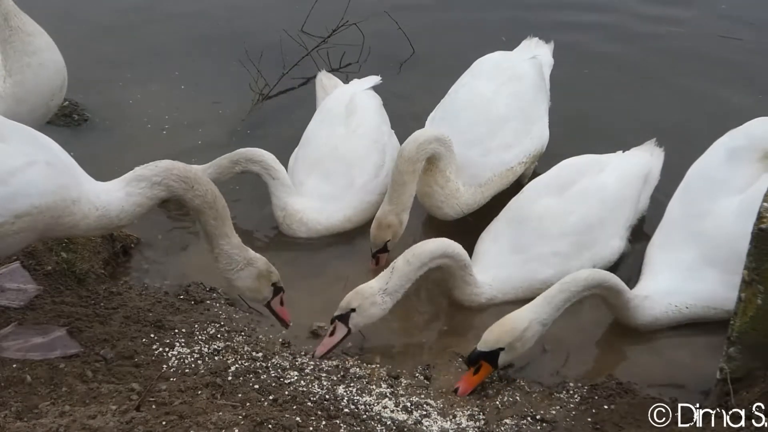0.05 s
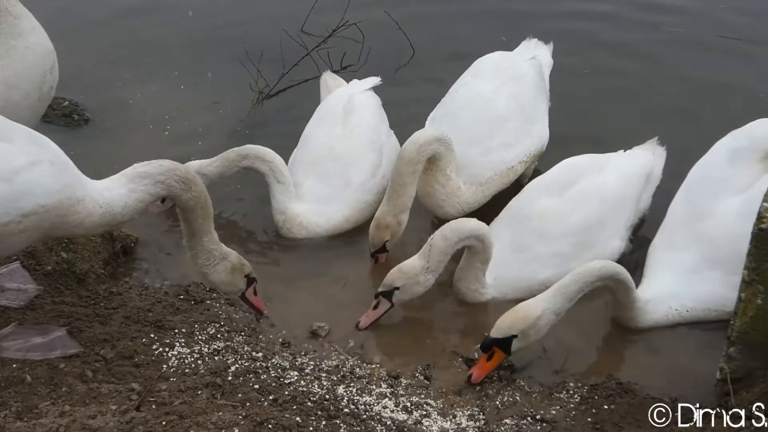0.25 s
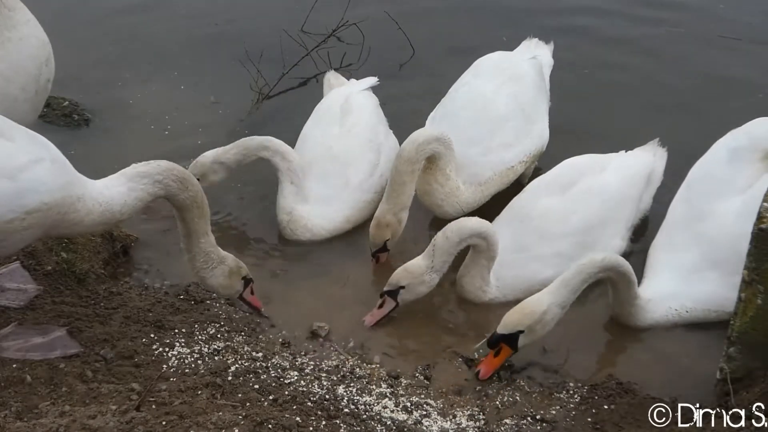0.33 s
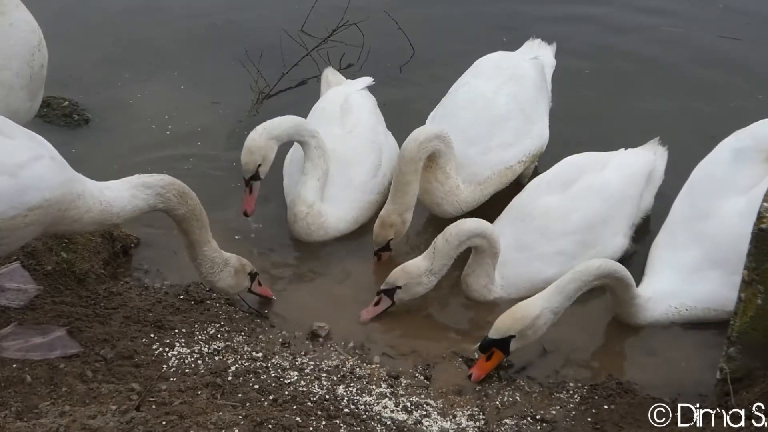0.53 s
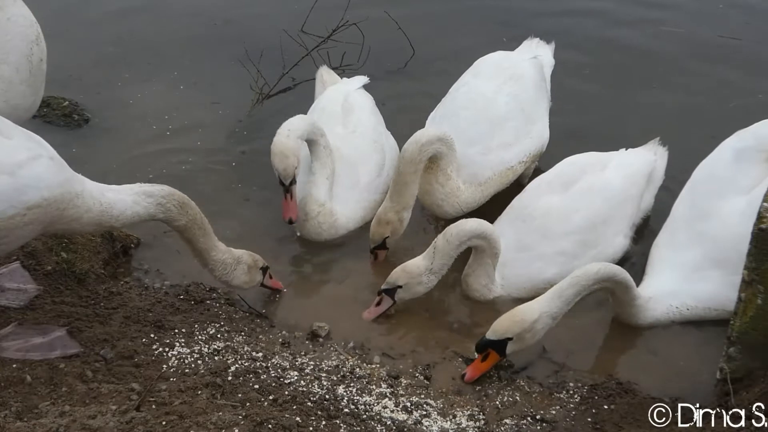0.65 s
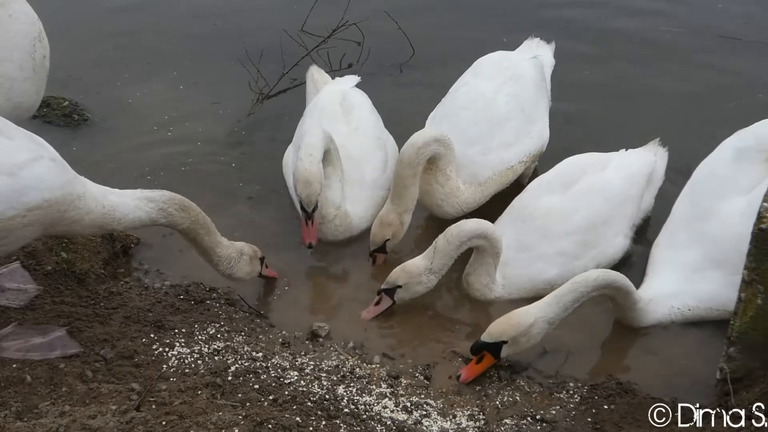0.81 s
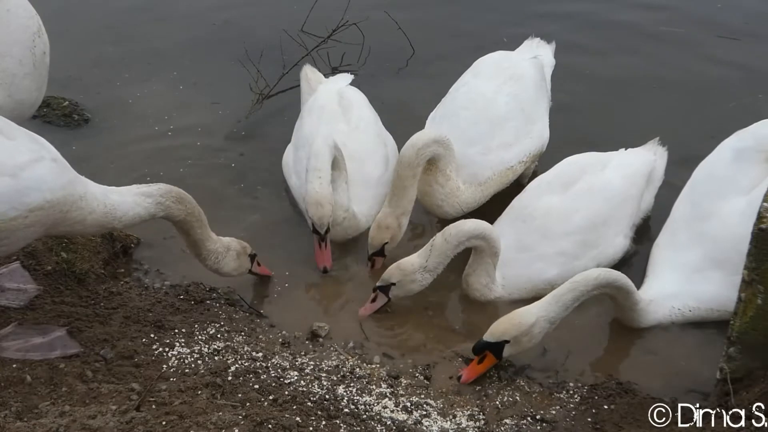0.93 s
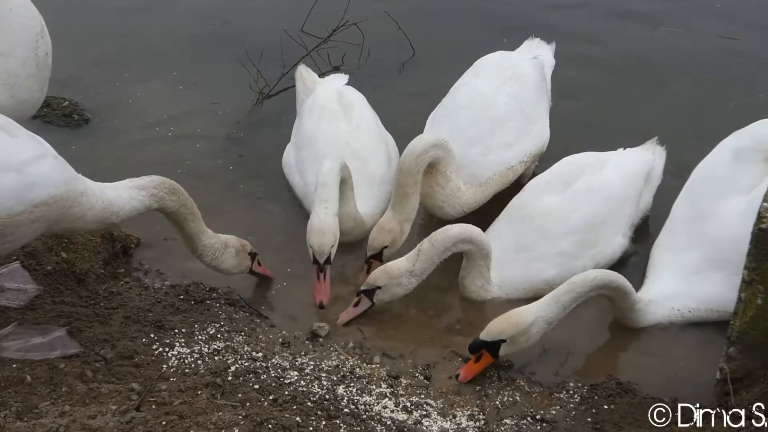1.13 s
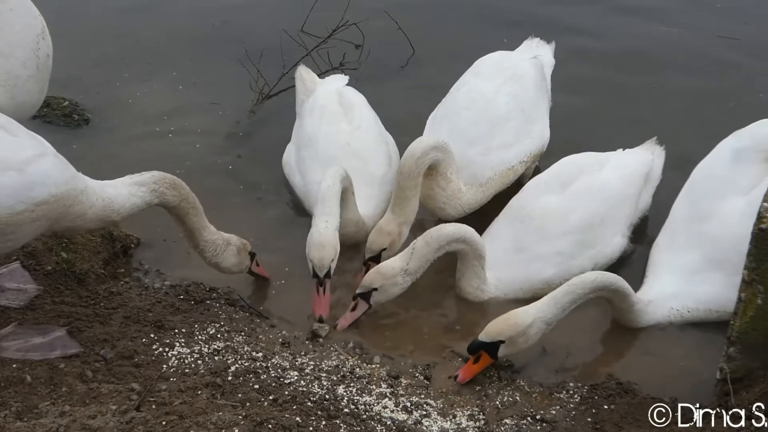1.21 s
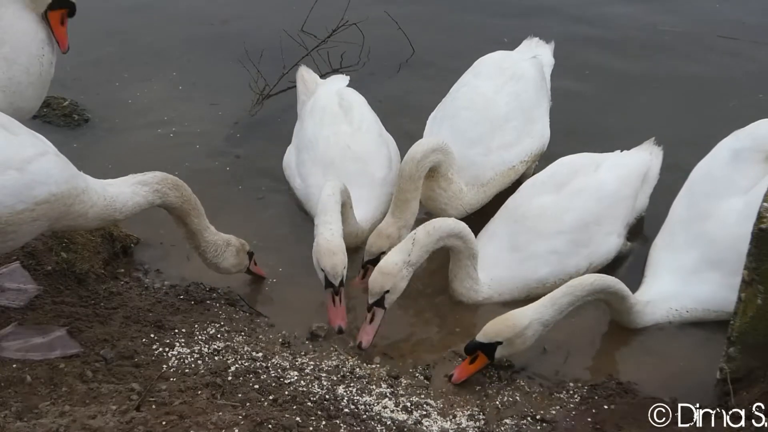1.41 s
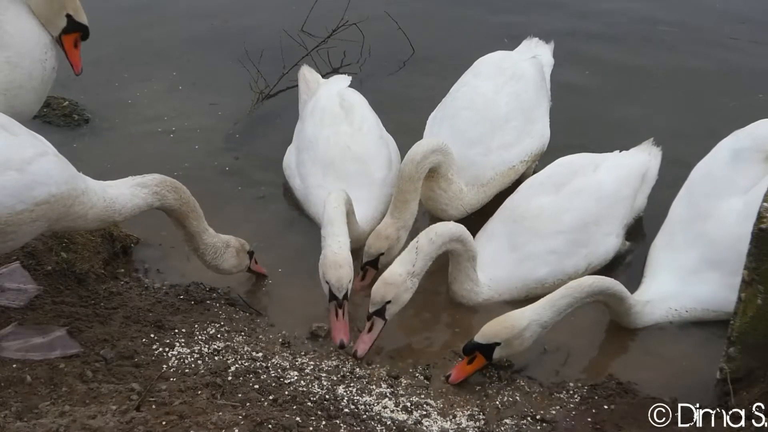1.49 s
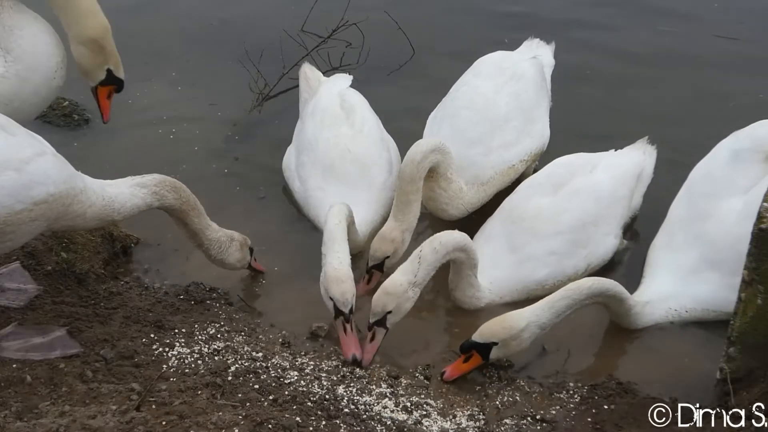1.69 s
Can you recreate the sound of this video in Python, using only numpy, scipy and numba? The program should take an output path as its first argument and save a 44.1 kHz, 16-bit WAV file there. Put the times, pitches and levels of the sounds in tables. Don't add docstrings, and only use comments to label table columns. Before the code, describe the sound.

Swan gives two short nasal snorting grunts while bills dabble in muddy shallow water outdoors

```python
import sys
import numpy as np
from scipy import signal
from scipy.io import wavfile
from scipy.ndimage import uniform_filter1d
from numba import njit

SR = 44100
rng = np.random.default_rng(int(sys.argv[2]) if len(sys.argv) > 2 else 0)


def transcribe(signal):
    frames = np.atleast_2d(signal).T
    limited = np.clip(frames, -1, 1)
    pcm = np.round(limited * 32767).astype(np.int16)
    wavfile.write(sys.argv[1], SR, pcm)


def voltage_ratio(level):
    return 10 ** (np.asarray(level, float) / 20)


N = 77175
SWAN_PAN_DB = 4

# start_s, peak_db, pitch_hz
SPRAY_TICKS = [
    (.09, -27, 4970),
    (.1075, -27, 4900),
    (.1855, -24, 10600),
    (.857, -26, 6800),
    (1.072, -26, 10500),
    (1.152, -26, 10100),
    (1.316, -28, 8800),
    (1.375, -16, 9400),
    (1.438, -33, 4600),
    (1.671, -21, 9200),
]


def unit(x):
    return x / np.sqrt(np.mean(x ** 2) + 1e-20)


@njit
def svf(x, hz, width):
    y, b, l = np.empty(len(x)), 0., 0.
    for i in range(len(x)):
        g, k = np.tan(np.pi * hz[i] / SR), width / hz[i]
        v = (b + g * (x[i] - l)) / (1 + g * (g + k))
        b, l, y[i] = 2 * v - b, l + 2 * g * v, k * v
    return y


def band(x, hz, width):
    return svf(x, np.clip(hz + np.zeros(len(x)), 20, .45 * SR), float(width))


def band_twice(x, hz, width):
    return band(band(x, hz, width), hz, width)


def highpass(x, hz, order):
    return signal.sosfilt(signal.butter(order, hz, "high", fs=SR, output="sos"), x)


def walk(rate, size):
    k = max(int(SR / rate), 2)
    return unit(uniform_filter1d(uniform_filter1d(rng.standard_normal(size), k), k))


def add(out, x, s, pan_db):
    i = max(int(s * SR), 0)
    x = x[:N - i]
    out[:, i:i + len(x)] += x * voltage_ratio(np.array([[pan_db], [-pan_db]]) / 2)


def ring(hz, t60, glide):
    t = np.arange(int(t60 * SR) + 9) / SR
    return np.sin(2 * np.pi * hz * t * (1 + glide * t / t60)) * voltage_ratio(-60 * t / t60)


def voice(rows, width_hz, nose_db, rasp_db, air_db, beak_db):
    # centre_hz, width_hz, level_db
    nose = [(570, 200, -8), (2150, 400, -9), (4100, 900, -26)]
    # centre_hz, width_hz, level_db
    beak = [(2900, 700, 0), (3800, 800, -2), (4900, 800, -9)]
    s, hz, db, throat = np.array(rows, float).T
    t = np.arange(s[0], s[-1] + 0.0005, 1 / SR)
    n = len(t)
    pitch = np.interp(t, s, hz)
    phase = 2 * np.pi * np.cumsum(pitch * (1 + .009 * walk(160, n))) / SR
    pulses = unit(sum(np.cos(k * phase) for k in range(1, 19)))
    rasp = voltage_ratio(rasp_db + 15) * rng.standard_normal(n) * (1 + np.cos(phase))
    source = pulses + rasp

    centre = np.interp(t, s, throat)
    y = unit(band(band_twice(source, centre, width_hz), centre, 2 * width_hz))
    y = y + voltage_ratio(nose_db) * sum(voltage_ratio(g) * unit(band_twice(source, f, w)) for f, w, g in nose)
    y = y / np.sqrt(uniform_filter1d(y ** 2, size=300) + 0.0074)

    beak_level = voltage_ratio(beak_db + 2 * walk(89, n)) * pitch / 500
    beak_tone = 0
    for f, w, g in beak:
        wandering_hz = f * (1 + 0.069 * walk(47, n))
        beak_tone = beak_tone + voltage_ratio(g) * unit(band(band(source, wandering_hz, w), f, 2 * w))
    y = y + beak_level * beak_tone

    y = y + voltage_ratio(-23) * unit(band_twice(y ** 2, 2 * centre, 1100))
    y = y + voltage_ratio(air_db) * unit(band(rng.standard_normal(n), 5300, 10000))
    release = np.clip((t[-1] - t) / 0.0054, 0, 1)
    return y * voltage_ratio(np.interp(t, s, db)) * release


def whines(out):
    # start_s, pitch_hz, level_db, throat_hz
    whine_paths = [
        [(.217, 273.5, -53, 574), (.229, 279.4, -29.5, 626), (.243, 307.6, -24, 665),
         (.257, 448.7, -25.5, 1040), (.271, 626, -16, 1240), (.283, 548.5, -23.5, 1260), (.29, 473, -21, 1120),
         (.292, 460, -25.5, 1050), (.299, 427, -29, 1030)],
        [(.803, 291.3, -46, 730), (.814, 305.2, -29.5, 746), (.83, 399, -29.5, 960), (.841, 483, -21, 974),
         (.852, 590, -20, 1150), (.866, 513, -25, 1140), (.87, 476, -18, 1080), (.881, 394, -31, 1040)],
    ]
    for rows in whine_paths:
        y = voice(rows, width_hz=480, nose_db=0, rasp_db=-18, air_db=-17, beak_db=-16.5)
        add(out, y, rows[0][0], SWAN_PAN_DB)


def grunts(out):
    # start_s, pitch_hz, level_db, throat_hz
    grunt_paths = [
        [(.3, 510, -24, 1670), (.309, 515.2, -12, 1940), (.3155, 507, -42, 1990), (.32, 476, -11.5, 1420),
         (.328, 464, -17, 1680), (.335, 331.7, -25, 1490), (.341, 340, -14, 1620), (.354, 292.7, -16, 1124),
         (.369, 257, -37, 1050)],
        [(.883, 520, -15, 1550), (.894, 520, -16, 2080), (.9005, 490, -34, 1600), (.9035, 465, -16, 1400),
         (.913, 490, -16, 1960), (.922, 311.5, -14, 1397), (.936, 309, -19, 1370), (.946, 278, -14.5, 1080),
         (.954, 288, -26.5, 1180)],
    ]
    for rows in grunt_paths:
        y = voice(rows, width_hz=430, nose_db=-18, rasp_db=-20, air_db=-33, beak_db=-23)
        add(out, highpass(y, 990, 6), rows[0][0], SWAN_PAN_DB)


def valve_clicks(out):
    # start_s, level_db
    clicks = [
        (.3008, -5.5),
        (0.8833, -3.5),
    ]
    # mode_hz, level_db
    airway_modes = [(320, -20.5), (480, -17.5), (1050, -10.5), (1550, -3)]
    for s, db in clicks:
        knock = sum(voltage_ratio(g) * ring(f, 0.025, 0) for f, g in airway_modes)
        add(out, -voltage_ratio(db) * uniform_filter1d(knock, size=6), s, SWAN_PAN_DB)


def coo(out):
    # start_s, pitch_hz, level_db
    coo_path = [
        (0.536, 328.5, -57),
        (.585, 388.4, -47),
        (0.619, 482.6, -38.5),
        (.7, 457.4, -44),
        (.76, 396, -44.5),
        (.78, 393.5, -77),
    ]
    overtones_db = [-14.5, -14.5, -15]
    s, hz, db = np.array(coo_path).T
    t = np.arange(s[0], s[-1], 1 / SR)
    phase = 2 * np.pi * np.cumsum(np.interp(t, s, hz) * (1 + 0.0091 * walk(49, len(t)))) / SR
    y = np.sin(phase)
    for k, g in enumerate(overtones_db):
        y = y + voltage_ratio(g) * np.sin((k + 2) * phase)
    level_db = np.interp(t, s, db) + 1.1 * walk(47, len(t))
    add(out, np.sqrt(2) * y * voltage_ratio(level_db), s[0], 2.6)


def dabbles(out):
    # start_s, peak_db, hiss_hz, length_s
    bill_snaps = [(0.0094, -28, 4000, 0.01), (0.161, -34, 3800, 0.017), (0.4222, -30.5, 4030, 0.013),
                  (0.4987, -29, 3860, 0.017), (0.5842, -21.5, 6800, 0.011), (0.661, -27, 4100, 0.011),
                  (0.7378, -34, 11490, 0.03), (0.982, -30.5, 6580, 0.017), (1.065, -27.5, 4230, 0.016),
                  (1.1407, -25, 9900, 0.0047), (1.2237, -23, 9100, 0.0068), (1.291, -25.5, 9800, 0.022),
                  (1.302, -27, 5570, 0.03), (1.371, -23, 10100, 0.011), (1.484, -24, 9400, 0.0052),
                  (1.533, -26.5, 4080, 0.037), (1.6087, -34, 4200, 0.045), (1.701, -31.5, 9800, 0.016)]
    t = np.arange(-.012, .06, 1 / SR)
    for s, db, hz, length in bill_snaps:
        swell = np.exp(t / (0.2 * length))
        tail = np.exp(-t / (0.2 * length)) + voltage_ratio(-18) * np.exp(-t / 0.066)
        env = np.where(t < 0, swell, tail) * voltage_ratio(db - 11.5)

        for pan_db in (12, -12):
            spray = unit(band(grit(len(t)), 8000, 7300))
            add(out, spray * env * voltage_ratio(-4.5), s - .01, pan_db)
        hiss = unit(band(grit(len(t)), hz, .16 * hz))
        body = voltage_ratio(4) * unit(band(grit(len(t)), 1700, 1650))
        add(out, (hiss + body) * env, s - .01, .5)


def grit(n):
    return rng.standard_normal(n) * voltage_ratio(5 * np.minimum(rng.exponential(size=n), 5))


def clacks(out):
    # start_s, peak_db
    bill_clacks = [
        (1.4275, -24),
        (1.4585, -9),
        (1.5197, -20),
    ]
    # mode_hz, level_db
    bill_modes = [(1450, -8), (2300, -3.5), (3300, -11), (4200, -5.5)]
    sos = signal.butter(3, (965, 4600), "band", fs=SR, output="sos")
    for s, db in bill_clacks:
        y = np.zeros(900)
        for hz, g in bill_modes:
            mode = ring(hz, 0.02 * 900 / hz, 0)
            y[:len(mode)] -= mode * voltage_ratio(g)
        add(out, signal.sosfilt(sos, y) * voltage_ratio(db + 0.5), s, 1.5)


def smacks(out):
    # start_s, peak_db, centre_hz
    wet_smacks = [(.038, -26, 4170), (.085, -35.5, 1270), (.149, -29.5, 3900), (0.1602, -23, 2720),
                  (.17, -32, 5900), (1.0436, -31, 2030), (1.1156, -24, 2470), (1.14, -28, 2200),
                  (1.149, -39, 2000), (1.182, -25, 3970), (1.203, -23, 4400), (1.23, -16.5, 2200),
                  (1.236, -23, 1800), (1.244, -19.5, 2450), (1.2913, -30, 1400), (1.309, -35, 1500),
                  (1.313, -19, 1160), (1.379, -12, 2250), (1.4142, -28, 1090), (1.463, -24, 7000),
                  (1.478, -31, 2330), (1.489, -24, 1110), (1.539, -22, 2570), (1.55, -27.5, 610),
                  (1.602, -26, 1800), (1.61, -24, 2230), (1.618, -22.5, 2300), (1.6723, -25.5, 3940),
                  (1.6734, -25, 1700), (1.683, -24, 2300), (1.711, -21, 1240), (1.744, -42, 2000)]
    t = np.arange(0, .015, 1 / SR)
    env = np.minimum(t / 0.00041, 1) * np.exp(-t / 0.0032)
    for s, db, hz in wet_smacks + SPRAY_TICKS[:2]:
        y = band_twice(rng.standard_normal(len(t)), hz, 0.41 * hz) * env
        y = y / np.abs(y).max()
        add(out, y * voltage_ratio(db - 7.5), s - .001, 1 + 3 * rng.standard_normal())


def drops(out):
    # start_s, peak_db, pitch_hz
    small_drops = [
        (0.007, -31, 1520),
        (0.063, -34, 1900),
        (0.14, -33, 4000),
        (0.643, -37, 520),
                   (1.1306, -33, 1990), (1.1617, -31, 1570), (1.1692, -31, 1750), (1.1753, -24.5, 2100),
                  (1.2027, -27, 1900), (1.2201, -28, 2180), (1.339, -29, 2040), (1.3828, -27.5, 1550),
                  (1.5057, -30, 1550), (1.5104, -29, 2250), (1.5313, -26.5, 1660), (1.5886, -28.5, 1660),
                  (1.6518, -33, 2240), (1.705, -27, 2110)]
    # start_s, peak_db, pitch_hz
    glugs = [
        (1.03, -40, 560),
        (1.081, -36.5, 594),
        (1.216, -39, 636),
        (1.248, -32, 578),
        (1.623, -39.5, 573),
        (1.709, -30.5, 568),
        (1.25, -39, 276),
        (1.345, -32.5, 587),
        (1.345, -41.5, 206),
    ]
    for rows, cycles in ((small_drops, 18), (glugs, 20), (SPRAY_TICKS[2:], 16)):
        for s, db, hz in rows:
            y = ring(hz, cycles / hz, 0.067)
            cycle = np.arange(len(y)) / SR * hz
            onset = np.sin(np.pi / 2 * np.minimum(cycle / 1.44, 1)) ** 2
            add(out, y * onset * voltage_ratio(db + 8.0), s - 1 / hz, 0.42 + 5 * rng.standard_normal())


def seethe(out):
    for when, pitch, loudness, place in rng.random((int(800 * N / SR), 4)):
        s = when * N / SR
        hz = 1100 * 8 ** (pitch ** 1.9)
        late_db = 5 * (when > .63)
        dabbling_db = 4 * np.sin(2 * np.pi * 12.3 * s + 1)
        busy_db = .5 * busy(s) + late_db + dabbling_db
        level_db = -52 + busy_db - 3.5 * np.log(1 - .93 * loudness)
        add(out, ring(hz, 14 / hz, .2) * voltage_ratio(level_db), s, 10 * (place - .45))


def busy(t):
    # start_s, level_db
    lapping = [
        (0.0, -51.5),
        (0.18, -56),
        (0.354, -56),
        (0.55, -55),
        (0.764, -51),
        (0.9, -54),
        (1.262, -50.5),
        (1.324, -54),
        (1.75, -54),
    ]
    return np.interp(t, *np.array(lapping).T) + 52.5


def bird(out):
    # start_s, length_s, start_hz, end_hz, level_db
    chirps = [
        (.938, .038, 2850, 2500, -46),
        (.998, .03, 2950, 2600, -49),
        (1.088, .06, 2350, 2900, -45),
        (1.142, .044, 2850, 3300, -47),
        (1.207, .032, 4000, 2250, -38),
    ]
    bends = [1, 1, .22, 1, .55]
    for (s, length, a_hz, b_hz, db), bend in zip(chirps, bends):
        u = np.linspace(0, 1, int(length * SR))
        phase = 2 * np.pi * np.cumsum(a_hz + (b_hz - a_hz) * u ** bend) / SR
        octave = voltage_ratio(-4) * (1.05 < s < 1.13) * np.sin(2 * phase)
        env = np.sin(np.pi * u) ** .5 * voltage_ratio(db + 1.8 * walk(330, len(u)))
        add(out, (np.sin(phase) + octave) * env, s, .6)


def air():
    # centre_hz, level_db per Hz
    floor_curve = [(28, -17), (150, 10.5), (450, -0.5), (2000, -5.5), (3000, -9), (10000, -14), (13000, 13),
                   (15500, -47.5)]
    # centre_hz, side_minus_mid_db
    side_curve = [(75, 4), (130, -9), (2000, -7), (14000, 0)]

    def at(curve, hz):
        curve_hz, db = np.array(curve).T
        return np.interp(np.log(hz), np.log(curve_hz), db)

    out, swell = 0, walk(16.0, N)
    lapping_db = busy(np.arange(N) / SR)
    for hz in 28 * 2 ** np.arange(0, 9.4, .5):
        mid, side = (unit(band_twice(rng.standard_normal(N), hz, hz / 2)) for _ in range(2))
        db = at(floor_curve, hz) + 10 * np.log10(hz)
        db = db + min(hz / 3100, 1) * lapping_db + 0.46 * swell
        db = db + 4 * min(hz / 900, 1) ** .5 * walk(59, N)
        side = voltage_ratio(at(side_curve, hz)) * side
        out = out + voltage_ratio(db) * (mid + side * np.array([[1], [-1]]))
    return unit(out) * voltage_ratio(-45)


def scene():
    out = np.zeros((2, N))
    for source in (whines, grunts, valve_clicks, coo, dabbles, clacks, smacks, drops, seethe, bird):
        source(out)
    return highpass(out, 130, 2) + air()


def low_pass(x):
    return signal.sosfilt(signal.butter(12, 16400, fs=SR, output="sos"), x)


def record(dry):
    mix = signal.sosfilt(signal.butter(6, 13000, fs=SR, output="sos"), dry)
    return low_pass(mix)


dry = scene()
out = record(dry)
transcribe(out)
```